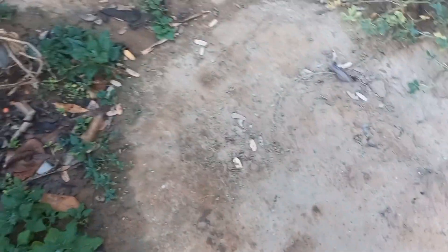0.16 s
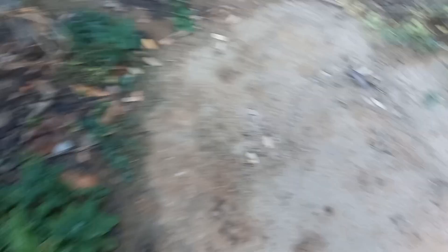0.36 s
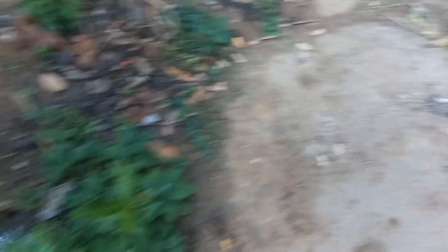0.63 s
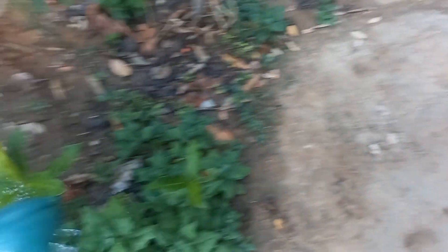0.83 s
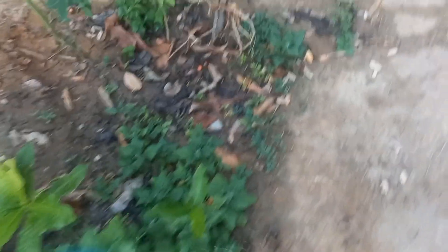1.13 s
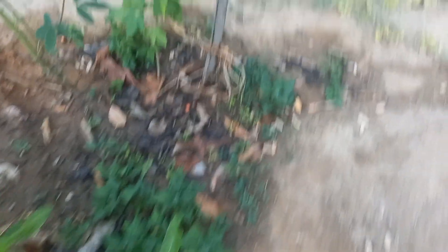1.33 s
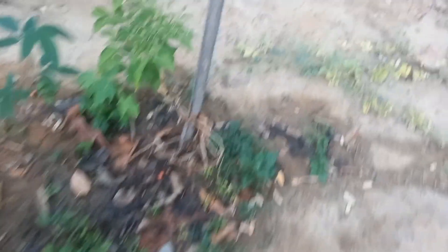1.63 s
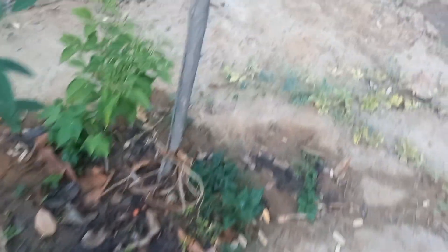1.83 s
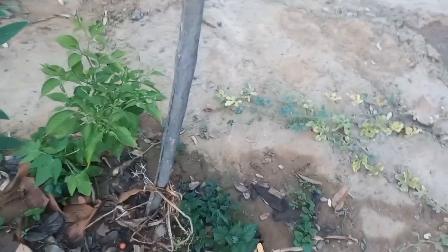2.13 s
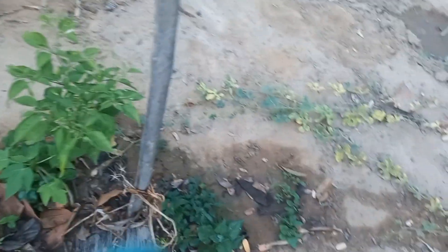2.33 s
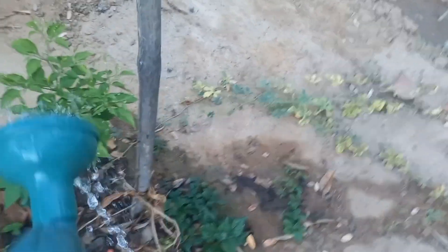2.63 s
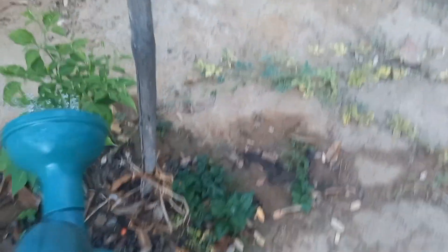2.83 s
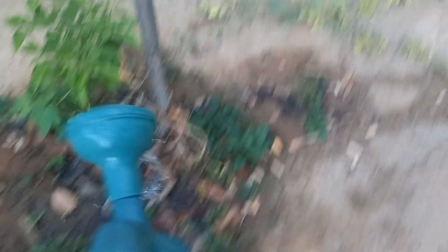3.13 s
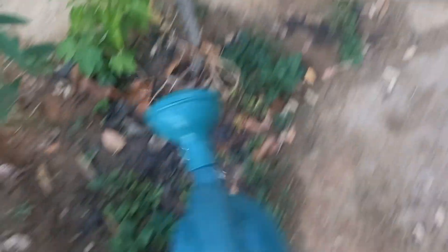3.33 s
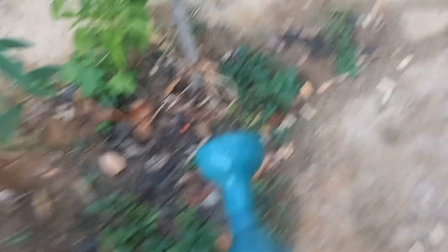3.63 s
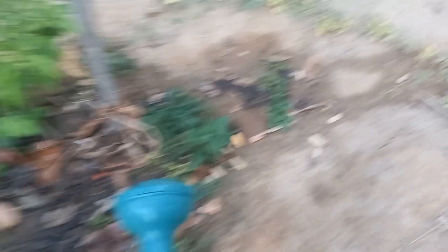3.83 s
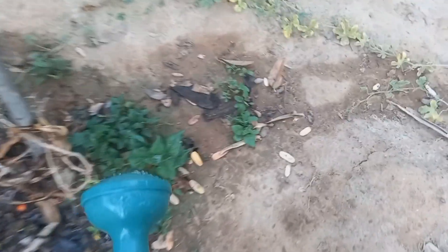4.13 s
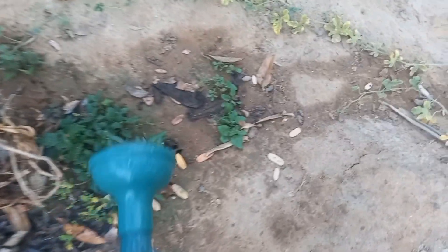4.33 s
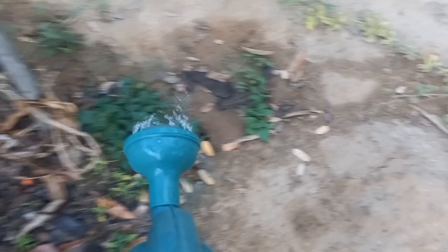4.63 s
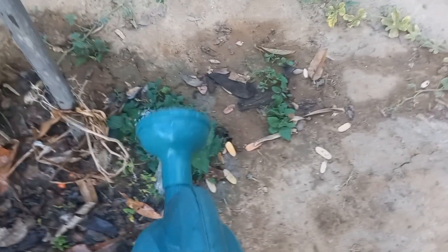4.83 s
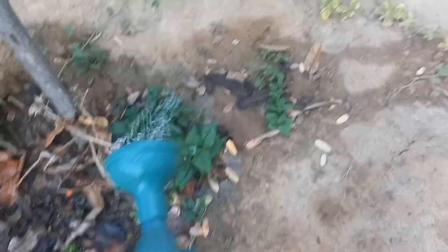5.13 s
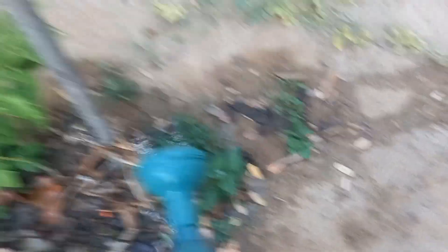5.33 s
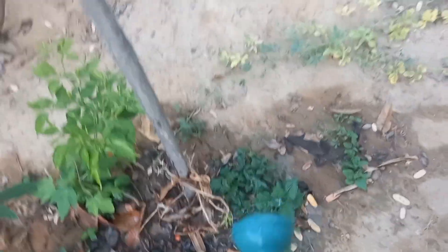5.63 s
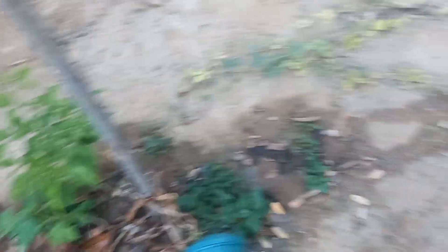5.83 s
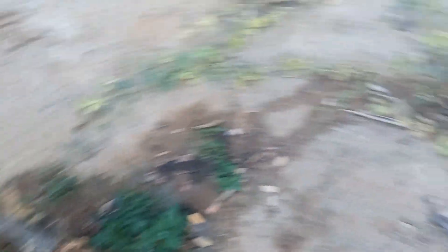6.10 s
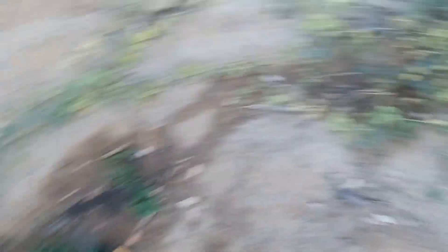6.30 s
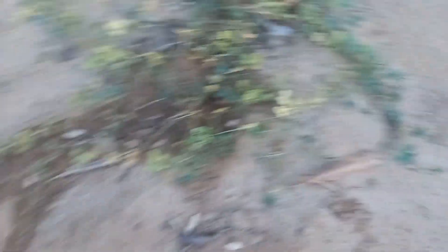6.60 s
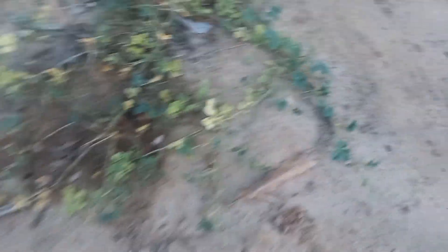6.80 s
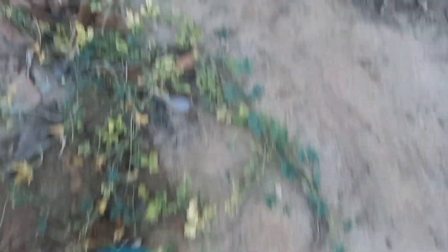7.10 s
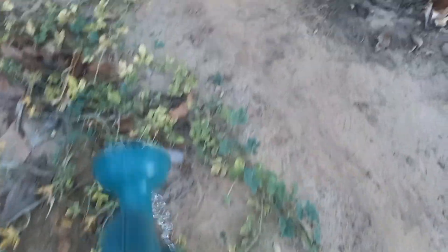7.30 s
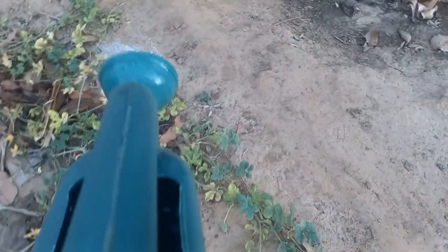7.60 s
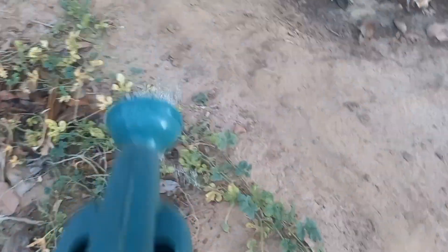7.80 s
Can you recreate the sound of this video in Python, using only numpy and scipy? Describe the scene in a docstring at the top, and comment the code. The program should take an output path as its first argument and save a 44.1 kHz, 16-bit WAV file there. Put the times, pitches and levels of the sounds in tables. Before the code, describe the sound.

Close, crisp splashing of fine spray and single plinking drops on garden plants, with hollow plastic knocks over a receding engine rumble.

```python
"""A plastic watering can sprinkles soil and leaves in a garden, heard close up by two microphone ports.
The spray is a crowd of ringing bubbles, noisy splats and dry leaf slaps, with hiss and a treble mist.
Single big drops plink, splat and crackle over it; knocks of the can ring its hollow plastic modes.
Far behind, an engine and road drone in shaped bands of noise, with an unsteady hum of sine tones."""
import sys
import numpy as np
from scipy import signal
from scipy.fft import rfft, irfft, next_fast_len
from scipy.io import wavfile
from scipy.ndimage import uniform_filter1d, map_coordinates

SR = 44100
rng = np.random.default_rng(int(sys.argv[2]) if len(sys.argv) > 2 else 0)


def persist_wave(psi):
    """Save psi, clipped to +-1, as 16-bit WAV."""
    counts = np.round(np.clip(psi, -1, 1) * 32767).astype(np.int16)
    wavfile.write(sys.argv[1], SR, np.atleast_2d(counts).T)


N = 350595

# Far engine and road over time. Each row: time in seconds, then rumble, roar, drone and whoosh levels in dB.
ENGINE_LEVELS = [(0, -17, -23, -29.5, -30), (.75, -25.5, -19.5, -34, -34),
                 (1.28, -27.5, -31.5, -47.5, -42.5), (1.6, -30.5, -30.5, -37, -42),
                 (2.45, -25.5, -29, -36.5, -37), (3.1, -25.5, -27.5, -32, -32.5),
                 (3.8, -24, -29.5, -35, -33.5), (4.05, -21.5, -27.5, -31.5, -33.5),
                 (4.67, -21.5, -23, -32.5, -37.5), (5.14, -22, -24, -40.5, -45),
                 (5.6, -23, -26, -36.5, -47), (5.8, -27.5, -30.5, -43.5, -44),
                 (6.3, -30.5, -35.5, -46.5, -50), (6.65, -26.5, -39.5, -49, -53.5),
                 (7.09, -30, -38, -50.5, -52.5), (7.33, -42.5, -46, -51, -50.5),
                 (7.95, -46.5, -39, -53, -62)]
# Spectra of those four noises. Each row: frequency in Hz, density in dB per Hz (only the shape counts).
RUMBLE_SPECTRUM = [(20, -44), (45, -25), (62, -5), (76, 3), (85, 11), (97, -1), (125, -1.5), (170, -42.5)]
ROAR_SPECTRUM = [(60, -27), (105, 1.5), (128, -6.5), (140, 3), (160, -8), (192, -6), (230, -14.5),
                 (330, -50)]
DRONE_SPECTRUM = [(120, -64), (220, 1), (330, 0), (430, -3), (520, -36), (900, -43)]
WHOOSH_SPECTRUM = [(250, -49), (480, -4), (750, 1), (1000, -3), (1300, -5), (2500, -19.5), (5000, -61)]
# How alike the far noise is at the two ports. Each row: frequency in Hz, left-right likeness from 0 to 1.
FAR_LIKENESS = [(25, 0.79), (60, 0.95), (130, 0.96), (290, 0.88), (640, 0.51), (1400, 0.097)]
# The drone loses its top as the engine draws off.
DULLS_FROM_S, DULLS_OVER_S, DULL_HZ = 2.85, 1.1, 320

# Spells in which one multiple of the shaft speed hums out.
# Each row: time of full level in seconds, hold in seconds, level in dB, multiple of the shaft speed.
HUM_SPELLS = [(0.41, 0.19, -23, 4), (0.656, 0.21, -21, 3), (0.85, 0.24, -29.5, 5), (1.286, 0.33, -25.5, 4),
              (2.058, 0.25, -22.5, 4), (2.46, 1.14, -21, 4), (3.197, 0.11, -20, 3), (3.665, 0.36, -28, 4),
              (4.555, 0.63, -28.5, 5), (5.604, 0.62, -35.5, 5), (7.61, 0.097, -34, 4),
              (2.904, 0.76, -37.5, 7), (7.44, 0.39, -50, 7)]
SHAFT_HZ, HUM_RISE_S, HUM_FADE_DB_PER_S = 27.8, 0.048, 128

# Knocks of the can. Each row: start in seconds, level in dB, thud in dB, rattle in dB, pitch factor.
CAN_KNOCKS = [(1.487, -17.5, -11, -18, 1.11), (2.411, -7.5, -2, -16.5, 1.03), (2.445, -21.5, -3, 1, 1.01),
              (4.755, -20.5, -29, -31, 1.07), (5.7095, -7, -34, -24, 1.01), (5.7205, -12.5, -23, -19, 0.93)]
# Ringing modes of the can. Each row: frequency in Hz, level in dB, time to fall 60 dB in seconds.
CAN_MODES = [(217, 5, 0.045), (316, 1, 0.075), (442, 5, 0.033), (678, 6, 0.046), (1048, 10, 0.075),
             (1583, 2.5, 0.081), (2040, 7, 0.034)]

# Loudest single drops. Each row: start in seconds, level in dB, bubble pitch in Hz.
BIG_DROPS = [(0.0938, -11, 3500), (0.1134, -14, 2420), (0.143, -16, 3500), (0.1553, -9, 6500),
             (0.386, -14, 2240), (0.5552, -15, 5900), (0.8239, -12, 4900), (0.899, -8, 5200),
             (1.129, -13, 5340), (1.286, -11, 5170), (1.363, -21, 2120), (1.43, -4.5, 5940),
             (1.4656, -9, 5370), (1.553, -6, 3580), (1.633, -11, 4200), (2.083, -29, 5960),
             (2.1642, -8.5, 4030), (2.2437, -13, 2260), (2.309, -13, 2080), (2.6294, -13, 2760),
             (2.724, -2.5, 5200), (2.7768, -13, 5260), (2.97, -9.5, 3320), (2.983, -9, 2750),
             (3.003, -13, 2400), (3.019, -13, 6000), (3.121, -5, 5540), (3.152, -14, 4660),
             (3.2545, -6, 2280), (3.279, -12, 2420), (3.333, -12, 3970), (3.3575, -7.5, 4200),
             (3.376, -13, 5400), (3.471, -12.5, 4260), (3.484, -8, 4270), (3.595, -12.5, 2600),
             (3.635, -11, 5330), (3.7419, -11.5, 5800), (4.0497, -11.5, 5860), (4.1684, -16, 2160),
             (4.2151, -13, 5000), (4.2416, -18, 1800), (4.2903, -19, 4220), (4.4668, -21, 5700),
             (4.4922, -16, 3300), (4.7785, -9, 3430), (4.952, -15.5, 3880), (5.281, -9.5, 1400),
             (5.5972, -8.5, 3000), (5.6148, -8, 6200), (5.6433, -10.5, 3870), (5.6746, 0, 4100),
             (5.887, -9, 3200), (5.9246, -14, 4800), (6.052, -9, 2900), (6.073, -12.5, 3000),
             (6.1, -10, 5470), (6.131, -12.5, 5850), (6.1731, -12, 2200), (6.229, -14, 1880),
             (6.238, -2, 1830), (6.256, -7, 4500), (6.3068, -5, 2010), (6.326, -1, 6250),
             (6.536, -13, 5000), (6.584, -2, 3550), (6.613, -1.5, 5220), (6.636, -8.5, 5100),
             (6.649, -9, 2100), (6.676, -4.5, 3930), (6.717, -13, 6300), (6.73, -16, 4830),
             (6.747, -16, 5100), (6.761, -17, 2720), (6.779, -4, 4500), (6.8182, -5.5, 4830),
             (6.842, -15, 4500), (6.89, -7.5, 2450), (6.904, -9, 3620), (6.913, -10, 4400),
             (6.925, -7.5, 6330), (6.9338, -15, 3900), (6.941, -8.5, 3870), (7.0378, -10.5, 3000),
             (7.132, -13, 6000), (7.155, -19, 5300), (7.232, -13.5, 3060), (7.3093, -16, 5900),
             (7.3234, -9, 6300), (7.339, -7, 3400), (7.393, -17, 6130), (7.548, -4.5, 5960),
             (7.561, -10.5, 6270), (7.578, -8, 6200), (7.655, -18, 2330), (7.691, -17.5, 1350),
             (7.776, -11.5, 4300), (7.898, -11.5, 1880), (7.913, -6, 4560)]
# Dry ticks of droplets in the treble. Each row: start in seconds, level in dB.
TREBLE_TICKS = [(0.7073, -10), (1.365, -7), (2.0826, -5.5), (2.2832, -9), (2.345, -1.5), (3.366, -10.5),
                (4.514, -9.5), (6.566, -6.5), (6.638, -4), (6.714, -5), (6.747, -2.5)]

# Gushes from the rose as the can is tipped and swung. Each row: time of full flow in seconds,
# hold in seconds, flow in dB, then heavy drops and puddle gurgle in dB over the flow.
ROSE_GUSHES = [(0, 0.29, -40, -4, -20), (0.366, 0.036, -41.5, 3.5, 1), (0.468, 0.28, -49, 1.5, -7),
               (0.819, 0.25, -40.5, -7, -3.5), (1.264, 0.37, -37.5, -11.5, -7),
               (1.917, 0.097, -45.5, -2.5, 3), (2.116, 0.063, -36.5, -28, -23),
               (2.207, 0.12, -35, -2.5, -6), (2.402, 0.43, -36.5, -3.5, -10), (2.935, 0.11, -43.5, 6.5, 10),
               (3.029, 0.14, -32.5, -14, -21), (3.258, 0.041, -45, 9.5, -18), (3.34, 0.13, -35.5, -18, -10),
               (3.571, 0.079, -40.5, -1.5, -22), (3.742, 0.25, -43.5, -29, -24),
               (3.985, 0.25, -39.5, -31, -6), (4.149, 0.13, -44, -3, 4.5), (4.318, 0.43, -42, -22, -10),
               (4.775, 0.19, -35.5, -7, -28), (5.045, 0.089, -35.5, -12, -13),
               (5.247, 0.12, -34.5, -9.5, -10.5), (5.426, 0.5, -35, -9.5, -35), (6.049, 0.093, -40, 4, -25),
               (6.202, 0.12, -38, -0.5, -7), (6.347, 0.14, -35, -15.5, -10), (6.585, 0.28, -44, -8, -32),
               (6.794, 0.021, -35.5, -6, -12), (6.896, 0.16, -36.5, -7.5, -8),
               (7.096, 0.32, -36.5, -33, -18.5), (7.472, 0.12, -35, -9.5, -29),
               (7.635, 0.35, -36, -1, -4.5), (7.86, 0.18, -31, -0.5, -16)]
GUSH_RISE_S, GUSH_FADE_DB_PER_S = 0.023, 144
# Trickle between gushes. One row: fine drops, heavy drops and gurgle, all in dB.
TRICKLE_LEVELS = (-51, -78, -79)
# Treble mist against the fine drops. Each row: time in seconds, level in dB.
MIST_LEVELS = [(0, 8.5), (.6, -1.5), (2.2, 7), (5.2, -7), (6.1, 8), (7.3, 7.5), (7.95, 2.5)]
# Where the water lands as the can swings. Each row: time in seconds, left over right in dB (mean removed later).
WATER_AIM = [(0.0, -11.5), (0.17, -2.5), (2.61, -5), (5.91, -5.5), (6.84, -4), (7.31, -4.5), (7.95, -1.5)]

# Colour of the microphone ports. Each row: frequency in Hz, left gain in dB, right gain in dB.
PORT_COLOUR = [(476, 1, 1), (1280, -12, -8.5), (2370, -6, 4.5), (3460, -6, -1.5), (4210, -6.5, 0.5),
               (6130, 1, -8), (6480, -2.5, -0.5), (7344, -19, -35), (7920, -28, -28.5),
               (11100, -30.5, -15.5), (13600, -25, -22.5), (15100, -11, -4.5), (15700, -5, -7),
               (15950, -25, -28), (16700, -43, -39)]
TOP_HZ = 17178  # band limit


def amp(db):
    """Decibels to linear gain."""
    return 10 ** (np.asarray(db) / 20)


def unit(x):
    """x scaled to an rms of 1."""
    return x / np.sqrt(np.mean(x ** 2) + 1e-20)


def along(points, hz, axis=1):
    """One column of a table that starts with Hz, read on a log axis."""
    table = np.transpose(points)
    return np.interp(np.log(hz + 1), np.log(table[0] + 1), table[axis])


def curves(rows):
    """One value per sample for each column after the time."""
    s, *columns = np.transpose(rows)
    return [np.interp(np.arange(N) / SR, s, column) for column in columns]


def wobble(rate):
    """A smooth random curve through `rate` knots a second."""
    knots = rng.standard_normal(int(N * rate / SR) + 4)
    return map_coordinates(knots, [np.arange(N) * rate / SR])


def swells(start_s, length_s, db, rise_s, fade_db_per_s):
    """Gain of overlapping swells: each rises up to its start, holds, then fades; their powers add."""
    step = 64  # samples between computed gains
    t = np.arange(0, N + step, step) / SR - start_s[:, None]
    rise = np.clip(t / rise_s + 1, 0, 1)
    past_hold = np.clip(t - length_s[:, None], 0, 9)
    each = rise * amp(db[:, None] - fade_db_per_s * past_hold)
    total = np.sqrt(np.sum(each ** 2, axis=0))
    return np.interp(np.arange(N) / step, np.arange(t.shape[1]), total)


def filtered(x, response):
    """x shaped by a response, given as a function of frequency."""
    m = next_fast_len(N + 8192)
    return irfft(rfft(x, m) * response(np.fft.rfftfreq(m, 1 / SR)), m)[..., :N]


def band(lo_hz, hi_hz, order):
    """Gain of a soft band-pass."""
    def gain(hz):
        below = 1 + (lo_hz / (hz + 1)) ** (2 * order)
        above = 1 + (hz / hi_hz) ** (2 * order)
        return (below * above) ** -.5
    return gain


def patchy(x, depth_db, size=512):
    """x with random patches of gain in time and frequency, the same at both ports."""
    z = signal.stft(x, nperseg=size)[2]
    field = rng.standard_normal(z.shape[-2:])
    field = uniform_filter1d(field, size=7, axis=0)
    field = uniform_filter1d(field, size=6, axis=1)
    return signal.istft(z * amp(depth_db * unit(field)), nperseg=size)[1][..., :N]


def near(response, own):
    """Close noise: shared by the ports with a lag that wanders with the source, plus each port's own share."""
    common, left, right = rng.standard_normal((3, N))
    lag = SR * 0.00006 * wobble(1.4)  # samples
    late = unit(map_coordinates(common, [np.arange(N) - lag], mode="wrap"))
    return unit(filtered(np.array([late + own * left, common + own * right]), response))


def far(spectrum):
    """Distant stereo noise of rms 1, alike at both ports in the bass and less so higher up."""
    def mid_side_gain(hz):
        turn = np.arccos(np.clip(along(FAR_LIKENESS, hz), -1, 1)) / 2
        return amp(along(spectrum, hz)) * [np.cos(turn), np.sin(turn)]
    mid, side = filtered(rng.standard_normal((2, N)), mid_side_gain)
    return unit(np.array([mid + side, mid - side]))


def hum():
    """Multiples of the shaft speed that stand out for a while, wavering in pitch and strength."""
    s, length, db, multiple = np.transpose(HUM_SPELLS)
    out = 0
    for k in (3, 4, 5, 7):
        mine = np.round(multiple) == k
        swell = swells(s[mine], length[mine], db[mine], HUM_RISE_S, HUM_FADE_DB_PER_S)
        gain = np.sqrt(2) * swell * amp(2.46 * wobble(9))
        pitch_hz = k * SHAFT_HZ * (1 + 0.01184 * wobble(6))
        out = out + gain * np.sin(2 * np.pi * np.cumsum(pitch_hz) / SR)
    return out


def engine():
    """Bands of far engine and road noise, each riding its own level, with the hum on top."""
    rumble_db, roar_db, drone_db, whoosh_db = curves(ENGINE_LEVELS)
    drone = far(DRONE_SPECTRUM)
    dull = np.clip((np.arange(N) / SR - DULLS_FROM_S) / DULLS_OVER_S, 0, 1)
    drone = (1 - dull) * drone + dull * filtered(drone, band(30, DULL_HZ, order=3))
    whoosh = amp(whoosh_db) * far(WHOOSH_SPECTRUM)
    road = patchy(amp(drone_db) * drone + whoosh, depth_db=2.5, size=2048)
    rumble = amp(rumble_db + 2.0 * wobble(7)) * far(RUMBLE_SPECTRUM)
    roar = amp(roar_db + 2.0 * wobble(7)) * far(ROAR_SPECTRUM)
    return rumble + roar + road + hum()


def knocks():
    """Each knock rings the hollow plastic, roughened by the water inside: low modes thud, high ones rattle."""
    out, t = np.zeros(N + SR), np.arange(SR // 8) / SR
    for s, db, thud_db, rattle_db, pitch in CAN_KNOCKS:
        for hz, level_db, t60 in CAN_MODES:
            if hz < 550:
                part_db, slosh = thud_db, 3.5
            elif hz > 900:
                part_db, slosh = rattle_db, 6.5
            else:
                part_db, slosh = 0, 0.9
            rough = 1 + slosh * uniform_filter1d(rng.standard_normal(len(t)), size=60)
            fade = amp(db + part_db + level_db - 60 * t / t60)
            ring = fade * rough * np.sin(2 * np.pi * hz * pitch * t)
            out[round(s * SR):][:len(t)] += ring * (1 - np.exp(-t / 0.0028))  # soft onset
    return out[:N] * amp([[-.4], [.4]])  # slightly to the right


def plinks(s, size, hz, cycles, rise, lag_s):
    """Bubbles trapped by drops: a soft start, a few cycles, the pitch rising as each nears the surface."""
    n = np.arange(int(4.5 * SR * np.max(cycles / hz)) + 16)
    out = []
    for side in (0, 1):
        delay = lag_s * side - np.minimum(lag_s, 0)  # positive lag: the right port hears it later
        turns = np.clip(n / SR - delay[:, None], 0, 1) * hz[:, None]
        u = turns / cycles[:, None]  # 1 at the peak of the envelope
        wave = u * np.exp(1 - u) * np.sin(2 * np.pi * turns * (1 + rise * np.minimum(u, 4)))
        at = (s * SR).astype(int)[:, None] + n
        out.append(np.bincount(at.ravel(), (size[side][:, None] * wave).ravel(), N)[:N])
    return np.array(out)


def bursts(s, size, t60):
    """Envelope of splats that swell for a moment and fall 60 dB in t60 seconds."""
    hits = [np.bincount((s * SR).astype(int), g, N)[:N] for g in size]
    fade = signal.lfilter([1], [1, -amp(-60 / (t60 * SR))], hits)
    return uniform_filter1d(fade, int(0.001 * SR) + 1, axis=1)


def drops():
    """Big drops on leaves and wet soil: a plink, a splat strongest near its pitch, a crackle in the treble."""
    s, db, hz = np.transpose(BIG_DROPS)
    d = rng.random((len(s), 3))
    size = amp(db + np.outer([1, -1], 4 * (d[:, 2] - .5)))  # random left-right balance
    cycles = hz * 0.00025 + 0.37 + 0.58 * d[:, 0]
    out = amp(-1.5) * plinks(s, size, hz, cycles, 0.0072, 0.00026 * (.5 - d[:, 1]))
    for centre_hz in (2100, 3400, 5600):
        share = amp(-5.5 * np.abs(np.log2(hz / centre_hz)))  # dB lost per octave from the pitch
        noise = near(band(centre_hz * 1.27, centre_hz * 1.44, order=2), own=0.3)
        crack = amp(-12.5) * bursts(s, size * share, 0.0096)
        wash = amp(-18.0) * bursts(s, size * share, 0.054)
        out = out + (crack + wash) * noise
    tick_s, tick_db = np.transpose(TREBLE_TICKS)
    crackle = bursts(s, size * amp(-7.5), 0.016) + bursts(tick_s, amp([tick_db] * 2), 0.018)
    return out + crackle * near(band(12300, 13300, order=3), own=0.17)


def shower(count, lo_hz, hi_hz, cycles, spread_db, splat_db, hiss_db, t60):
    """Random drops in a band: each a plink and a splat, a few far larger than the rest, over a patchy hiss."""
    d = rng.random((count, 6))
    s = d[:, 0] * (N - 1) / SR
    size = amp(-spread_db * np.log(d[:, 1] + 0.054) + np.outer([1, -1], 7 * (d[:, 2] - .5)))
    hz = lo_hz * (hi_hz / lo_hz) ** d[:, 3]
    ring = unit(plinks(s, size, hz, cycles * (0.52 + d[:, 4] ** 2), 0.013, 0.00015 * (.5 - d[:, 5])))
    colour = band(lo_hz, hi_hz, order=4)
    splat = unit(bursts(s, size, t60))
    wash = amp(splat_db) * splat * near(colour, own=0.25) + amp(hiss_db) * near(colour, own=1.0)
    return ring + patchy(wash, depth_db=3.5), splat


def snaps(count, lo_hz, hi_hz, spread_db, t60):
    """Scattered drops that slap a leaf flat: one dry click across a wide band, no bubble."""
    d = rng.random((count, 3))
    size = amp(-spread_db * np.log(d[:, 1] + 0.24) + np.outer([1, -1], 6 * (d[:, 2] - .5)))
    slap = unit(bursts(d[:, 0] * (N - 1) / SR, size, t60))
    return slap * near(band(lo_hz, hi_hz, order=3), own=0.25), slap


def spray():
    """Puddles gurgle, heavy drops sound low, fine drops high, slaps span both; mist crackles in step."""
    s, length, flow_db, *over_db = np.transpose(ROSE_GUSHES)
    gains = []
    for db, least_db in zip((0, *over_db), TRICKLE_LEVELS):
        gush = swells(s, length, flow_db + db, GUSH_RISE_S, GUSH_FADE_DB_PER_S)
        gains.append(np.hypot(amp(least_db), gush))
    fine_gain, heavy_gain, gurgle_gain = gains
    surge_db = 0.51 * wobble(7.2) + 2.3 * wobble(35)  # the jets break up in clumps

    gurgle, _ = shower(count=1200, lo_hz=1046, hi_hz=1556, cycles=4.5, spread_db=6.5,
                       splat_db=0.0, hiss_db=-0.5, t60=0.023)
    heavy, _ = shower(count=5000, lo_hz=1670, hi_hz=2900, cycles=3.8, spread_db=5.0,
                      splat_db=3.0, hiss_db=-3.0, t60=0.0089)
    fine, patter = shower(count=4500, lo_hz=3150, hi_hz=7900, cycles=3.3, spread_db=4.5,
                          splat_db=-0.5, hiss_db=-3.0, t60=0.017)
    clicks, slap = snaps(count=560, lo_hz=3000, hi_hz=8300, spread_db=3.0, t60=0.012)
    smacks, _ = snaps(count=320, lo_hz=1700, hi_hz=4800, spread_db=7.5, t60=0.014)

    mist = patchy(near(band(9900, 9400, order=3), own=0.75), depth_db=3.0)
    mist = mist * (0.71 + 0.36 * patter ** 2.38 + 0.9 * slap)
    mist_db, = curves(MIST_LEVELS)
    mist = amp(mist_db + 3.23 * wobble(18)) * mist

    low = gurgle_gain * amp(2.5 * wobble(17)) * gurgle
    low = low + heavy_gain * amp(0.57 * wobble(23)) * heavy
    low = low + np.sqrt(heavy_gain * fine_gain) * amp(-0.5) * smacks
    high = fine_gain * (fine + amp(2.5) * clicks + mist)
    return amp(surge_db) * (low + high)


def scene():
    """The water leans left and right with the aim of the can; knocks and engine keep their own place."""
    aim_db, = curves(WATER_AIM)
    balance = amp(np.outer([.5, -.5], aim_db - aim_db.mean()))
    return (spray() + drops()) * balance + knocks() + engine()


def record(dry):
    """Each port has its own colour, with a deep dip above 7 kHz; the right lags; a band limit cuts the top."""
    def ports(hz):
        colour = amp([along(PORT_COLOUR, hz, axis=1), along(PORT_COLOUR, hz, axis=2)])
        late = np.exp(-2j * np.pi * np.outer([-.5, .5], hz) * 1.7e-4)  # 0.17 ms between the ports
        return colour * late * (hz < TOP_HZ)
    return filtered(dry, ports)


dry = scene()
out = record(dry)
persist_wave(out)
```